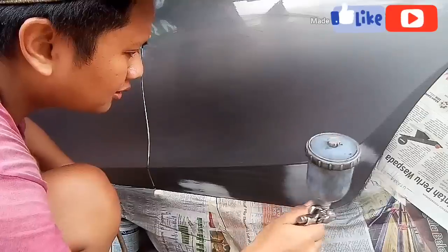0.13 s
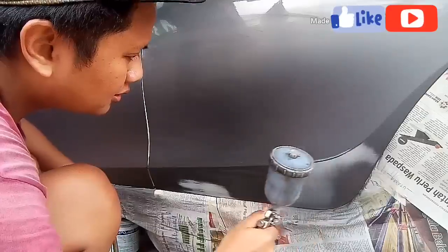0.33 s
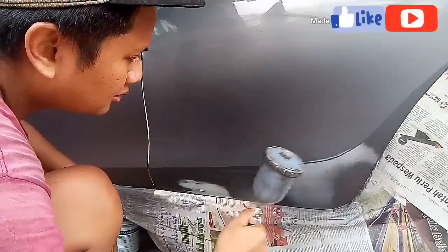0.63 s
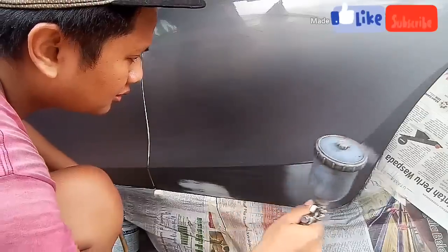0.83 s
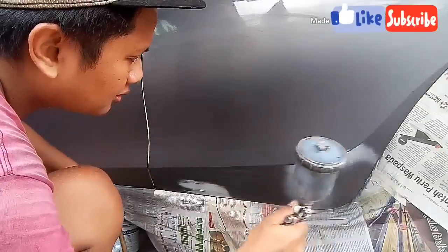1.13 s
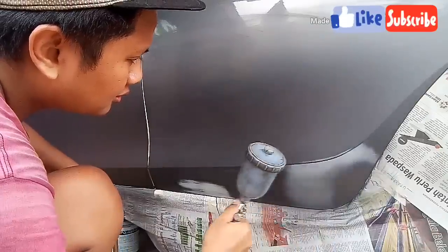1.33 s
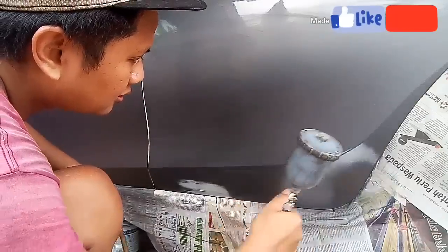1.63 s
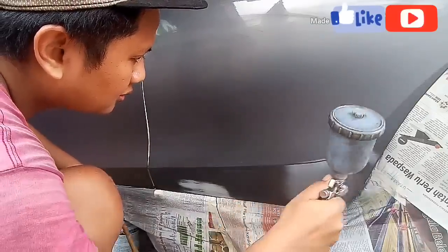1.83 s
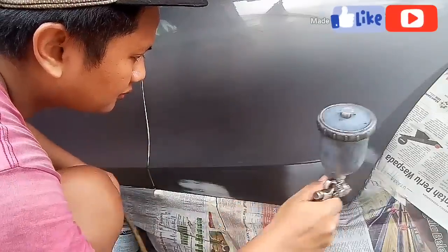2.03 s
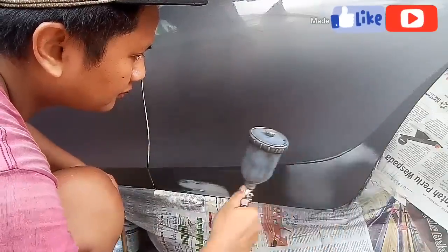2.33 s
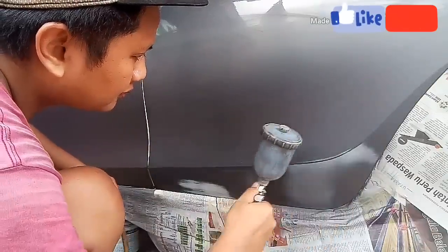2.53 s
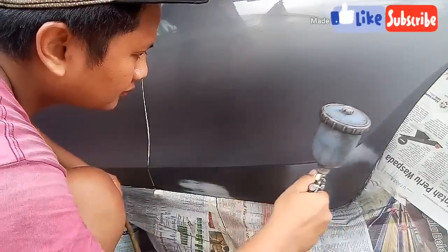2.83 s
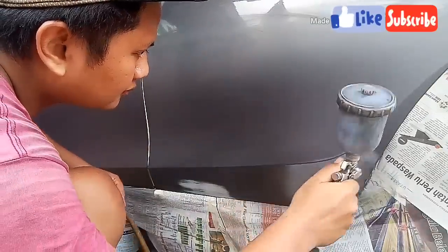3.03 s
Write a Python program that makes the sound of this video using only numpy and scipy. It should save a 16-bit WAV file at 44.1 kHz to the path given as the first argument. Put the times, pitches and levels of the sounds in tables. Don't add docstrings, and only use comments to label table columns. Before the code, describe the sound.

A spray gun hisses continuously close to a phone microphone, its paint fan roaring softly in six passes over a car panel, with a few dull echoing knocks and faint yard hum behind.

```python
import sys
import numpy as np
from scipy import signal
from scipy.fft import rfft, irfft
from scipy.io import wavfile
from scipy.ndimage import uniform_filter1d

SR = 44100
rng = np.random.default_rng(int(sys.argv[2]) if len(sys.argv) > 2 else 0)


def waveform_to_disk(signal):
    frames = np.transpose(np.atleast_2d(signal))
    scaled = np.clip(frames, -1, 1) * 32767
    samples = np.round(scaled).astype(np.int16)
    wavfile.write(sys.argv[1], SR, samples)


def rack_gain(trim_db):
    fader = np.asarray(trim_db, float)
    return 10 ** (fader / 20)


N = 141120

# f/Hz, density/(dB per Hz)
JET_LEFT = [(900, -97.5), (1900, -95), (2700, -82), (3800, -84), (4500, -85), (6600, -85.5), (7800, -92.5),
            (8200, -99)]
JET_RIGHT = [(1100, -100), (1700, -91.5), (2700, -80), (4000, -76.5), (6500, -72.5), (6900, -77.5),
             (7800, -82.5), (8400, -103)]
# f/Hz, density/(dB per Hz)
FIZZ_LEFT = [(7600, -108), (8300, -91), (9200, -93), (11000, -96), (13900, -98), (14600, -90), (15400, -84),
             (15600, -98)]
FIZZ_RIGHT = [(7200, -100), (8200, -85), (10500, -84), (13700, -85), (14200, -86), (14700, -71),
              (15400, -71.5), (15600, -95)]
# f/Hz, density/(dB per Hz)
FLANK = [(13800, -90), (14100, -83), (14450, -78.5), (14700, -92)]
# f/Hz, density/(dB per Hz)
SPLASH = [(350, -112), (500, -101), (650, -95), (900, -91), (1250, -93.5), (1900, -87), (2500, -92),
          (3800, -106)]
# start t/s, end t/s, level/dB
STROKES = [
    (0.194, 0.518, 6),
    (0.74, 0.947, 7),
    (1.148, 1.367, 5.5),
    (1.55, 1.884, 5.5),
    (2.09, 2.389, 5),
    (2.586, 3.106, 5),
]
# t/s, level/dB
PRESSURE = [(0, 1), (.15, 0.5), (.25, 1.5), (.45, .5), (.6, -.5), (.8, .5), (.95, 0), (1.1, 0), (1.25, 1),
            (1.45, -1.5), (1.7, .5), (2.0, 0), (2.1, -.5), (2.22, 1), (2.5, -1.5), (2.75, 0), (2.9, .5),
            (3.2, -.5)]
# t/s, peak level/dB, echo share/1
KNOCKS = [
    (0.207, -28, 0.7),
    (0.429, -46.5, 1.3),
    (.585, -51, 0.74),
    (1.264, -40, 1.1),
    (1.526, -55, 0.71),
    (2.998, -57, 1),
]
# f/Hz, level/dB, t60/s
BODY = [(224, -2.5, .05), (332, 3, .04), (394, -2, 0.055), (472, -3, 0.045), (553, -2, 0.045),
        (796, -11, 0.035)]
# delay t/s, level/dB
ECHOES = [(.013, -1), (.024, 1), (0.047, -7.5), (.054, -7.5), (.064, -11), (.088, -11), (.122, -16.5)]
# f/Hz, density/(dB per Hz)
YARD = [(20, -105), (45, -110), (70, -95), (110, -89), (150, -85.5), (200, -95.5), (260, -104), (400, -115)]
# f/Hz, density/(dB per Hz)
BREEZE = [(15, -95), (40, -94), (75, -89), (200, -104)]
# f/Hz, density/(dB per Hz)
CLATTER = [(170, -100), (230, -88), (330, -92.5), (450, -92.5), (700, -100), (1000, -108)]
# t/s, level/dB
BUSY = [(0, -7), (.2, -0.5), (.6, 1), (1, -3), (1.5, 1.5), (2.1, -2), (2.3, -4), (2.6, -6.5), (3.2, 1.5)]
# f/Hz, rms level/dB, waver/dB
MOTOR = [(65, -87.5, 1), (99.3, -74, 2), (115.3, -72.5, 0), (138.9, -68, 1), (168.5, -77, 4.5),
         (187.8, -73, 0)]
# centre t/s, length/s, f/Hz, level/dB
RUMBLES = [(3.175, 0.01, 100, -52.5), (3.155, 0.017, 155, -57.5), (3.12, 0.043, 120, -64),
           (3.06, 0.048, 65, -64), (2.97, .035, 65, -63), (3.15, 0.059, 68, -60), (2.92, .04, 140, -58.5),
           (2.74, .03, 71, -61), (2.68, .018, 135, -68), (1.45, 0.035, 125, -58), (0.462, 0.025, 190, -59),
           (1.19, 0.04, 225, -61), (0.58, 0.044, 250, -65.5), (.95, 0.21, 110, -69.5),
           (1.28, 0.016, 235, -58), (1.3, .024, 420, -56), (1.5, 0.0096, 360, -62), (.3, .03, 410, -60.5),
           (.34, 0.013, 390, -61.5), (.27, 0.018, 490, -58.5), (0.454, .012, 420, -62),
           (1.28, 0.017, 140, -58.5)]
# f/Hz, (step over rms)/1
STEP_LEFT = [(300, .15), (1800, 1.2), (6800, 1.6), (7600, 2.8), (9500, 2.3), (12500, 2.6), (14100, 3.7),
             (14500, 1.1)]
STEP_RIGHT = [(300, .15), (1000, .7), (2900, 1.5), (3800, .8), (6500, .65), (8000, 1), (13000, .9),
              (14700, .55)]

STROKE_EDGE_S, JET_FOLLOWS, FIZZ_FOLLOWS = 0.022, 0.05, 0.065
SPLASH_LIKE, YARD_LIKE, CLATTER_LIKE = 0.6, 0.65, 0.45
SPLASH_PAN_DB, KNOCK_PAN_DB = -3.5, -1.7
TAIL_DB, TAIL_T60_S, TAIL_HZ = -15.5, 0.4, 418
RIGHT_LAG_S = 0.0001
TOP_HZ = 15470
STEP_SCATTER_DB, FRAME, FRAME_START = 2.5, 1024, 107


def walk(rate_hz):
    hold = int(SR / rate_hz)
    steps = np.repeat(rng.standard_normal(N // hold + 1), hold)
    steps = uniform_filter1d(uniform_filter1d(steps, hold), hold)[:N]
    drift = uniform_filter1d(steps, size=4 * hold)
    return 1.6 * np.tanh(1.2 * (steps - drift))


def hiss(table, control_db=0., like=0., flicker_db=1., flicker_hz=15., count=6, channels=1):
    hz, density_db = np.array(table).T
    log_f, log_hz = np.log(np.arange(1, N // 2 + 2) * SR / N), np.log(hz)
    colour = rack_gain(np.interp(log_f, log_hz, density_db, left=-200, right=-200)) * np.sqrt(SR / 2)
    like = np.clip(like, 0, 0.99)
    white = rng.standard_normal((channels + 1, N))
    mixed = np.sqrt(like) * white[0] + np.sqrt(1 - like) * white[1:]
    spectrum = rfft(mixed) * colour
    centres = np.linspace(log_hz[0], log_hz[-1], count)
    out = np.zeros((channels, N))
    for row in np.eye(count):
        band = irfft(spectrum * np.interp(log_f, centres, row), N)
        out += band * rack_gain(control_db + flicker_db * walk(flicker_hz))
    return out


def pan(db):
    return rack_gain(np.array([[db], [-db]]) / 2)


def lag_right(x):
    return np.array([x[0], np.roll(x[1], int(RIGHT_LAG_S * SR))])


def gun():
    t = np.arange(N) / SR
    swing_db = np.zeros(N)
    for start, end, db in STROKES:
        rise, fall = np.tanh((t - start) / STROKE_EDGE_S), np.tanh((t - end) / STROKE_EDGE_S)
        swing_db += db * (rise - fall) / 2
    calm_db = swing_db - swing_db.mean()
    air_db = 0.55 * walk(38)
    feed_db = np.interp(t, *np.array(PRESSURE).T)

    jet_db = feed_db + JET_FOLLOWS * calm_db + 1.13 * air_db
    jet = np.array([hiss(colour, jet_db, flicker_db=0.93, flicker_hz=25.99, count=9)[0]
                    for colour in (JET_LEFT, JET_RIGHT)])

    fizz_db = 0.6 * feed_db + FIZZ_FOLLOWS * calm_db + 0.9 * air_db
    fizz = np.array([hiss(colour, fizz_db, flicker_db=1.88, flicker_hz=30.24)[0]
                     for colour in (FIZZ_LEFT, FIZZ_RIGHT)])
    fizz[1] += hiss(FLANK, flicker_db=4.5, flicker_hz=13., count=2)[0]

    splash = hiss(SPLASH, swing_db + 0.77 * air_db, SPLASH_LIKE, flicker_db=2.03, channels=2)
    return jet + fizz + lag_right(splash) * pan(SPLASH_PAN_DB)


def body_ring(t):
    colour = rack_gain(1.8 * rng.standard_normal((2, len(BODY)))) * (-1.) ** np.arange(len(BODY))
    attack = np.minimum(t * 400, 1)
    ring = np.zeros((2, len(t)))
    for k, (hz, db, t60_s) in enumerate(BODY):
        mode = np.sin(2 * np.pi * hz * t) * rack_gain(-60 * t / t60_s) * attack
        ring += colour[:, [k]] * rack_gain(db) * mode
    return ring / 3


def knocks():
    out, t = np.zeros((2, N + SR)), np.arange(SR // 2) / SR
    sos = signal.butter(2, [TAIL_HZ / 2, TAIL_HZ * 1.58], "band", fs=SR, output="sos")
    tail_fade = rack_gain(-60 * t / TAIL_T60_S) * (1 - np.exp(-t / 0.005))
    for at_s, peak_db, share in KNOCKS:
        sound = np.zeros((2, SR))
        for lag_s, echo_db in [(0, 0)] + ECHOES:
            i = int(lag_s * SR)
            sound[:, i:i + len(t)] += body_ring(t) * rack_gain(echo_db) * (share if lag_s else 1)
        noise = rng.standard_normal((2, len(t))) + 0.9 * rng.standard_normal(len(t))
        tail = signal.sosfilt(sos, noise)
        sound[:, :len(t)] += share * rack_gain(TAIL_DB) * tail / tail.std() * tail_fade
        i = int(at_s * SR)
        out[:, i:i + SR] += rack_gain(peak_db) * sound
    return out[:, :N] * pan(KNOCK_PAN_DB)


def motor():
    out = np.zeros(N)
    for hz, db, waver_db in MOTOR:
        level = np.sqrt(2) * rack_gain(db + waver_db * walk(9))
        phase = 2 * np.pi * np.cumsum(hz * (1 + 0.015 * walk(2.985))) / SR
        out += level * np.sin(phase)
    return out


def rumble():
    t, out = np.arange(N) / SR, np.zeros(N)
    for at_s, length_s, hz, db in RUMBLES:
        phase = 2 * np.pi * np.cumsum(hz * (1 + 0.06 * walk(25))) / SR
        swell = np.exp(-0.5 * ((t - at_s) / length_s) ** 2)
        out += np.sqrt(2) * rack_gain(db) * swell * np.sin(phase)
    return out


def yard():
    busy_db = np.interp(np.arange(N) / SR, *np.array(BUSY).T)
    hum = hiss(YARD, like=YARD_LIKE, flicker_db=7.5, flicker_hz=8.14, channels=2)
    breeze = hiss(BREEZE, flicker_db=-0.5, flicker_hz=5.8, count=3, channels=2)
    clatter = hiss(CLATTER, busy_db, CLATTER_LIKE, flicker_db=5., flicker_hz=12., count=4, channels=2)
    return hum + breeze + clatter + motor() + rumble()


def scene():
    far = yard() + knocks()
    return gun() + lag_right(far)


def coarse(x, table):
    n, k = np.arange(2 * FRAME), np.arange(FRAME) + 0.5
    window = signal.windows.kaiser_bessel_derived(2 * FRAME, 4 * np.pi)
    basis = np.cos(np.pi / FRAME * np.outer(n + 0.5 + FRAME / 2, k))
    basis = basis * window[:, None] * np.sqrt(2 / FRAME)
    lead = 2 * FRAME - FRAME_START
    x = np.pad(x, (lead, 2 * FRAME))
    at = np.arange(0, len(x) - 2 * FRAME, FRAME)[:, None] + n
    tones = x[at] @ basis
    rms = np.sqrt(uniform_filter1d(np.mean(tones ** 2, axis=0), size=9)) + 1e-9
    scatter = np.repeat(rng.standard_normal((len(at), 128)), FRAME // 128, axis=1)
    relative_step = np.interp(k * SR / 2 / FRAME, *np.array(table).T)
    step = rms * relative_step * rack_gain(STEP_SCATTER_DB * scatter)
    tones = np.sign(tones) * np.floor(np.abs(tones) / step + 0.4) * step
    return np.bincount(at.ravel(), (tones @ basis.T).ravel())[lead:][:N]


def top_cut(x):
    return signal.sosfilt(signal.butter(12, 16870, fs=SR, output="sos"), x)


def record(dry):
    low_pass = signal.ellip(12, 0.2, 70, TOP_HZ, fs=SR, output="sos")
    left, right = signal.sosfilt(low_pass, dry)
    mix = np.array([coarse(left, STEP_LEFT), coarse(right, STEP_RIGHT)])
    return top_cut(mix)


dry = scene()
out = record(dry)
waveform_to_disk(out)
```